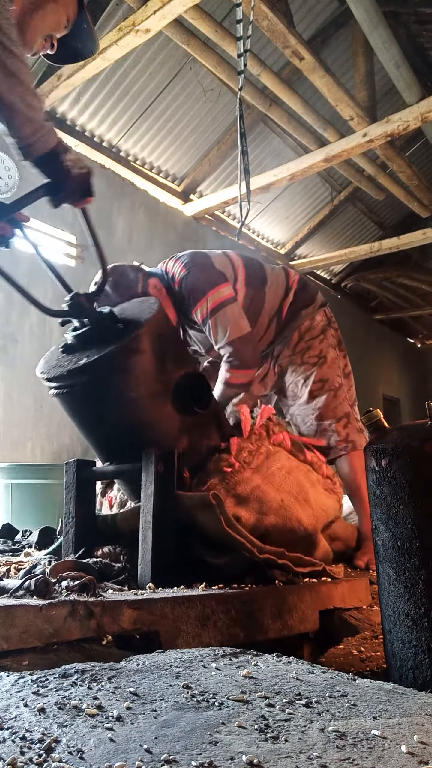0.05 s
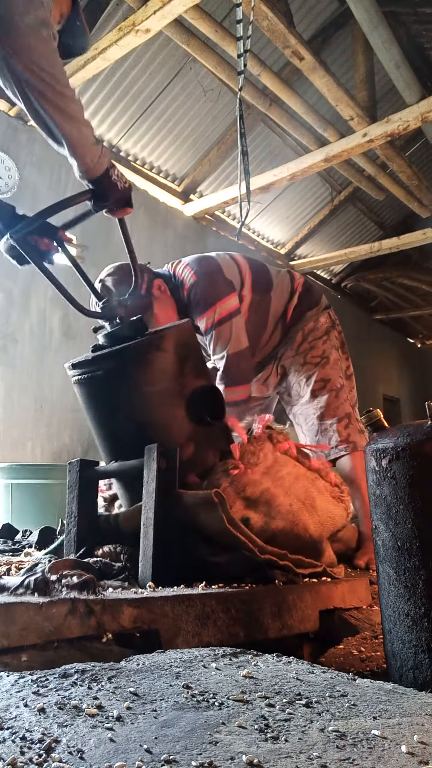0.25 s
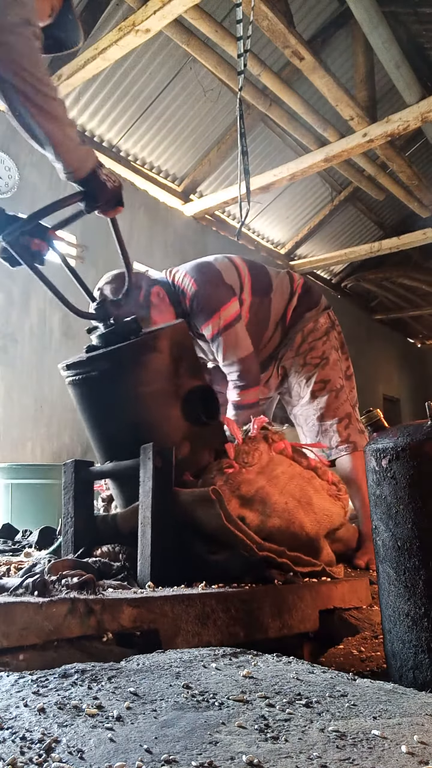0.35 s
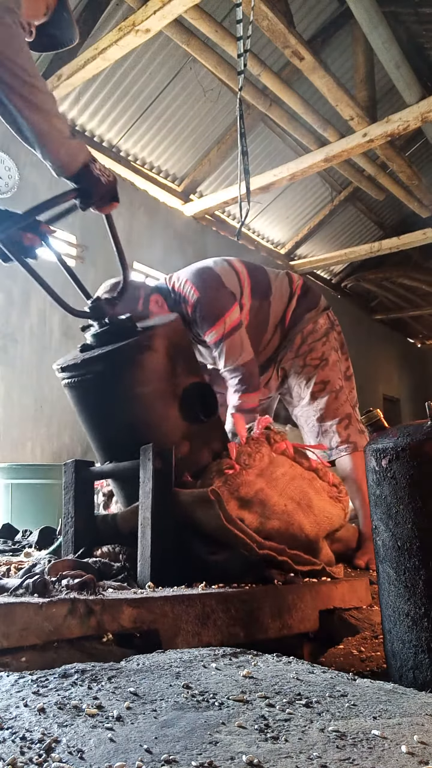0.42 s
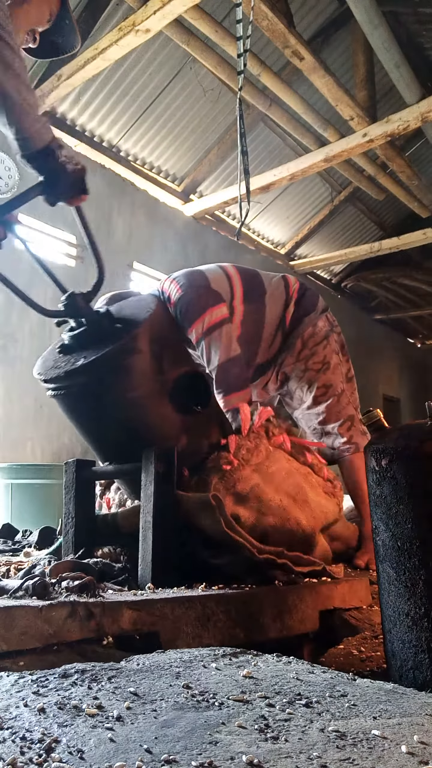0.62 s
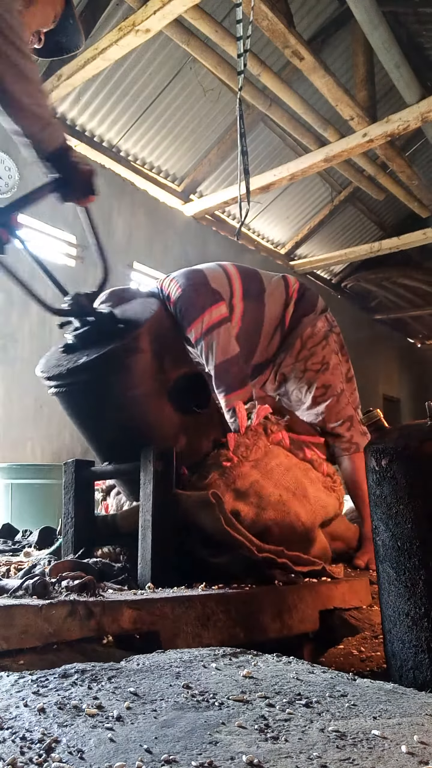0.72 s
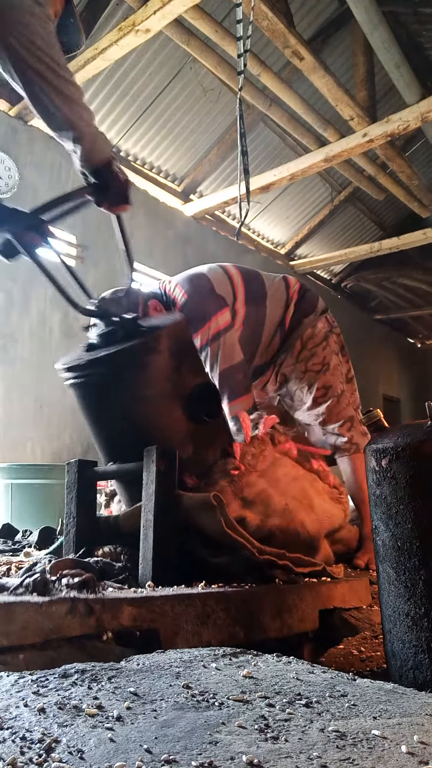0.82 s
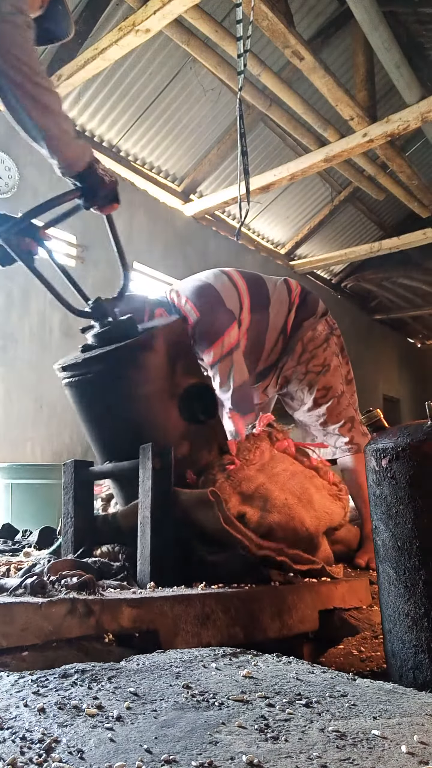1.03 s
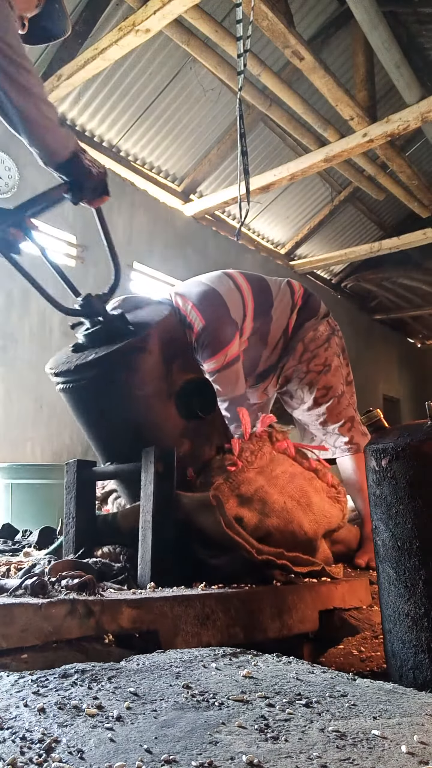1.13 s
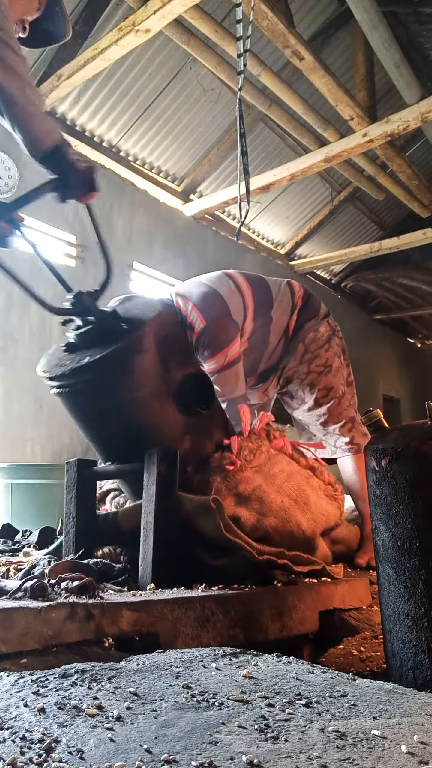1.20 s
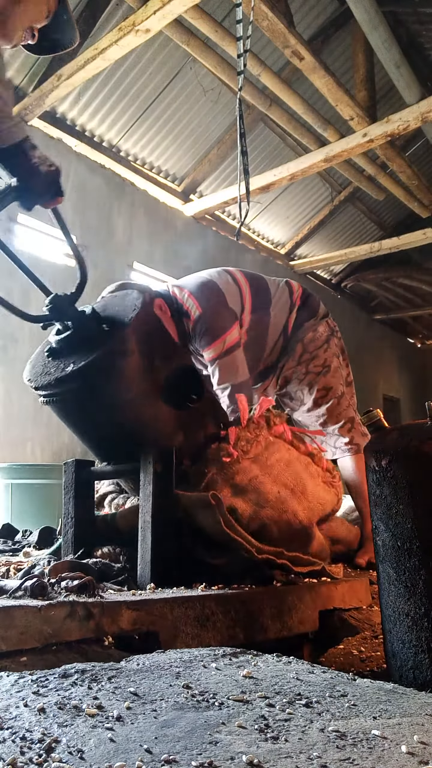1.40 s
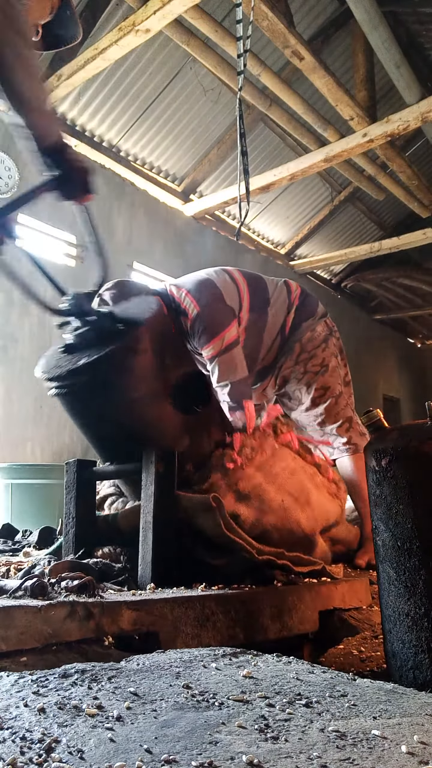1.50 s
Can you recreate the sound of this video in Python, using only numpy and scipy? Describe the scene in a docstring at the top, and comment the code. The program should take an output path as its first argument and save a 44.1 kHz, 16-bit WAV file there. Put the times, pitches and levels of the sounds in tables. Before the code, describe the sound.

Metal clanks and squeaks as a steel handle is worked twice on a metal vessel.

```python
"""In a shed, a steel handle is worked to and fro twice on a metal vessel.
Each stroke starts with a ring of the handle, scrapes, and ends in a rattling clank: a train of tiny
contacts that rings the steel and booms in the vessel. On the way back the dry pivot squeaks and the
handle clanks more lightly. A pin clinks, and the vessel knocks on its stand and rumbles as it rocks."""
import sys
import numpy as np
from scipy import signal
from scipy.fft import rfft, irfft, next_fast_len
from scipy.io import wavfile
from scipy.ndimage import uniform_filter1d, map_coordinates

SR = 44100
rng = np.random.default_rng(int(sys.argv[2]) if len(sys.argv) > 2 else 0)


def bounce(signal):
    """Save signal as a 16-bit WAV file at the path given by the first command-line argument."""
    frames = np.transpose(np.atleast_2d(signal))
    limited = np.clip(frames, -1, 1)
    pcm = np.round(limited * 32767).astype(np.int16)
    wavfile.write(sys.argv[1], SR, pcm)


N = 68355

# Each row: start in seconds, level in dB, boom against the clank in dB, rattle t60 in seconds,
# treble tilt in dB per octave, attack in seconds.
CLANK_HITS = [(0.2915, -16.5, -3.5, 0.059, -1, .002), (0.305, -18.5, -1.5, 0.04, 2, 0.0045),
              (0.34, -23.5, -5, 0.29, -1.5, 0.0097), (0.378, -27, -1, 0.093, -5.5, 0.0037),
              (0.4525, -33.5, -13.5, 0.16, -6, 0.003), (0.572, -37.5, -30, 0.073, 0, 0.0016),
              (0.583, -25, -22, 0.19, -1, 0.0012), (0.614, -34.5, -9.5, 0.11, -3, .003),
              (0.9152, -18.5, 2, 0.11, 3, .0012), (0.9225, -18.5, -50, 0.12, 2.5, 0.00067),
              (0.958, -22, 3, 0.13, -6, 0.003), (0.978, -21, -1.5, 0.15, -1.5, 0.001),
              (1.02, -31, 6.5, 0.27, -10.5, 0.0015), (1.217, -28.5, -35, 0.055, 6, 0.005),
              (1.231, -23, -14, 0.12, 2, .002), (1.299, -40, -9, 0.066, 2, 0.0012)]
def clanks(wall):
    """The handle hits its stop and the loose parts rattle to rest."""
    out, t = np.zeros(N), clock()
    for start, db, boom_db, t60, tilt_db, attack_s in CLANK_HITS:
        force = chatter() * amp(-60 * t / t60) * (1 - np.exp(-t / attack_s))
        add(out, start, amp(db) * shed(burst(metal(force, boom_db, tilt_db, wall))))
    return out


# Each row: start and length in seconds, level in dB, boom in dB, treble tilt in dB per octave.
SCRAPE_STROKES = [(0.236, 0.14, -28.5, 1, -5), (0.883, 0.041, -26, -6.5, -4.5),
                  (1.109, 0.086, -39.5, 0, -8.5), (1.535, 0.012, -48.5, -18, -3.5)]
def scrapes(wall):
    """Steel drags over steel as the handle moves."""
    out, t = np.zeros(N), clock()
    for start, length, db, boom_db, tilt_db in SCRAPE_STROKES:
        force = chatter() * np.sqrt(np.abs(np.sin(np.pi * np.minimum(t / length, 1))))
        gain = amp(db) * np.sqrt(length / 0.036)  # longer scrapes carry more energy
        add(out, start, gain * shed(metal(force, boom_db, tilt_db, wall)))
    return out


# Bright steel and hollow vessel. Each row: pitch in Hz, relative level in dB, t60 in seconds.
STEEL_MODES = [(1254, -3, 0.48), (1347, 2, 0.15), (1391, 11, 0.73), (1727, 9.5, 0.23), (2121, 6.5, 0.049),
               (3157, 0, 0.66), (3742, -12, 0.16), (3993, -4, 0.04), (4020, -18.5, .16), (4250, 1, 0.12),
               (4910, 9, 0.064), (5274, 8, 0.076), (5660, 11.5, 0.047), (5680, -22, 0.13),
               (9170, 8.5, 0.058)]
VESSEL_MODES = [(419, -38, 0.21), (542, -18, 0.098), (601, -8, 0.053), (660.4, 5, 0.064), (700.8, 6, 0.13),
                (727, 1, 0.092), (780, 2, 0.33)]
def metal(force, boom_db, tilt_db, wall):
    """Contacts click, ring the steel and the wall, and boom in the vessel."""
    clicks = burst(through(force, contact(tilt_db)))
    bright = burst(clicks + amp(-7) * burst(through(clicks, wall)))
    tilted = [(hz, db + tilt_db * np.log2(hz / 3000), t60) for hz, db, t60 in STEEL_MODES]
    steel = resonate(force, tilted)
    boom = burst(band(resonate(force, VESSEL_MODES), lo_hz=381, hi_hz=773))
    return bright + amp(-11.5) * steel + amp(boom_db) * boom


# The tone of the click. Each row: frequency in Hz, level in dB.
CONTACT_EQ = [(100, -41), (300, -45.5), (700, 3.5), (980, -20), (1350, 8), (1800, -1.5), (2900, 2.5),
              (4000, 4.5), (5300, 6), (7000, -5.5), (9300, -5), (11200, -7.5), (13000, -21.5), (15500, -12)]
def contact(tilt_db, size=2048):
    """The click of steel on steel, its treble tilted about 3 kHz."""
    hz = np.fft.rfftfreq(size, 1 / SR)
    octaves = np.log2(np.maximum(hz, 1000) / 3000)
    cepstrum = irfft(np.log(amp(along(CONTACT_EQ, hz) + tilt_db * octaves)))
    cepstrum[1:size // 2] *= 2  # minimum phase keeps the attack sharp
    cepstrum[size // 2 + 1:] = 0
    return irfft(np.exp(rfft(cepstrum)))


def chatter(spread=0.12, grain_samples=12):
    """A dense train of tiny contacts of uneven force."""
    n = len(clock())
    contacts = rng.standard_normal(n)
    grains = np.repeat(rng.standard_normal(n), grain_samples)[:n]
    return contacts * np.exp(spread * grains)


def vessel_wall(count=80, lo_hz=1607.6, hi_hz=11530, t60=0.067):
    """The sheet-metal wall answers a click with many close modes of uneven strength."""
    modes = []
    for k, (offset, weakness, sustain) in enumerate(rng.random((count, 3))):
        hz = lo_hz * (hi_hz / lo_hz) ** ((k + offset) / count)
        modes.append((hz, -6 * weakness, t60 * (.5 + sustain)))
    return ring(modes)


# Each row: start and length in seconds, pitch in Hz, level in dB,
# then octave overtone and rasp in dB against the fundamental.
PIVOT_SQUEAKS = [(0.006, 0.017, 4995, -37.5, -23, -26), (0.0, 0.072, 1220, -53.5, -9, -6.5),
                 (0.021, 0.066, 4577, -48, -16, -21), (0.132, 0.074, 3325, -50, -32, -19),
                 (0.197, 0.034, 1277, -25.5, -22, -17), (0.276, .007, 3776, -29, -30, 0),
                 (0.533, 0.026, 4357, -21, -16.5, -10.5), (0.568, .026, 4293, -21.5, -24.5, -13),
                 (0.572, 0.028, 1321, -39, -22, -17), (0.673, 0.069, 1320, -56.5, -34, 7.5),
                 (0.726, 0.14, 3320, -57.5, -26, -5.5), (0.837, 0.033, 1299, -34, -38, -24),
                 (1.063, 0.095, 1338, -42, -28, -4), (1.157, 0.052, 4400, -32.5, -24, 3.5),
                 (1.175, 0.016, 4375, -21.5, -48, -19), (1.194, 0.039, 1395, -34.5, -23, 2.5),
                 (1.225, 0.019, 4460, -25, -32, -7), (1.214, 0.099, 1360, -42, -25, 2),
                 (1.298, 0.032, 1290, -41, -35, 1.5)]
def squeaks(waver_depth=.007, waver_rate_hz=300, rasp_width_hz=320):
    """The dry pivot sticks and slips near one pitch, swelling and fading, with a rasp around it."""
    out, t = np.zeros(N), clock()
    for start, length, hz, db, octave_db, rasp_db in PIVOT_SQUEAKS:
        waver = map_coordinates(rng.standard_normal(len(t)), [t * waver_rate_hz])
        phase = 2 * np.pi * np.cumsum(hz * (1 + waver_depth * waver)) / SR
        tone = np.sqrt(2) * (np.sin(phase) + amp(octave_db) * np.sin(2 * phase))
        rasp = unit(band(rng.standard_normal(len(t)), hz - rasp_width_hz / 2, hz + rasp_width_hz / 2))
        swell = np.sin(np.pi * np.minimum(t / length, 1)) ** 2
        add(out, start, amp(db) * shed(swell * (tone + amp(rasp_db) * rasp)))
    return out


# The handle's ring. Each row: pitch in Hz, relative level in dB, t60 in seconds.
HANDLE_MODES = [(1252, -10, 0.6), (2181, 14.5, 0.033), (2960, -31, 0.13), (3830, 17, 0.021),
                (4170, 18, 0.03), (5550, -12, 0.18), (9360, 3, 0.032)]
# Each row: start in seconds, level in dB.
HANDLE_HITS = [(0.1985, -26.5), (0.8435, -33)]
def handle_rings():
    """The handle takes up its play and rings with a soft attack."""
    return taps(HANDLE_HITS, HANDLE_MODES, attack_s=0.017, crack_db=-7, tilt_db=-0.5, crack_t60=0.092)


# The pin's ring. Each row: pitch in Hz, relative level in dB, t60 in seconds.
PIN_MODES = [(5600, -8, 0.092), (7780, -0.5, 0.042), (7830, 2, 0.072), (7980, -5.5, 0.046),
             (8430, -6, .025), (8700, -1, 0.029), (9340, -6.5, .035), (9800, -10.5, 0.026)]
# Each row: start in seconds, level in dB.
PIN_HITS = [(0.2245, -35.5), (0.844, -30), (0.857, -32), (1.029, -32), (1.204, -42.5), (1.301, -40.5)]
def pin_clinks():
    """Light blows on the small pin give thin, high clinks."""
    return taps(PIN_HITS, PIN_MODES, attack_s=0.00071, crack_db=-3.5, tilt_db=6, crack_t60=0.047)


# The pin's ring on a landing. Each row: pitch in Hz, relative level in dB, t60 in seconds.
LANDING_MODES = [(5960, -10, 0.17), (6130, -1, 0.23), (7850, -26, .12), (8900, 4, 0.067), (8930, 4, 0.053),
                 (11200, -14, 0.041)]
# Each row: start in seconds, level in dB.
LANDING_HITS = [(0.585, -32), (1.234, -38.5)]
def landings():
    """The handle lands back and sets the pin ringing."""
    return taps(LANDING_HITS, LANDING_MODES, attack_s=0.00057, crack_db=-2, tilt_db=7.5, crack_t60=0.047)


# The body of a knock. Each row: pitch in Hz, relative level in dB, t60 in seconds.
STAND_MODES = [(214.5, -11.5, 0.11), (267.5, -12, 0.067), (307.4, -8.5, 0.11), (354.7, 1.5, 0.095),
               (403.6, 2, 0.1), (448.6, -3, 0.096), (497, -2.5, 0.083)]
# Each row: start in seconds, level in dB.
STAND_HITS = [(0.0, -34.5), (0.016, -32), (0.296, -35.5), (0.36, -35), (0.605, -45), (0.94, -32.5),
              (0.985, -43.5), (1.02, -37), (1.145, -39.5), (1.205, -39.5)]
def stand_knocks():
    """The vessel knocks dully on its stand."""
    return taps(STAND_HITS, STAND_MODES, attack_s=.012, crack_db=-10, tilt_db=-2, crack_t60=0.035)


# The rumble's fader moves. Each row: time in seconds, level in dB.
RUMBLE_FADER = [(0.0, -48.5), (0.05, -53), (0.072, -60), (0.206, -39.5), (0.322, -50.5), (0.358, -50),
                (0.43, -56), (0.604, -43.5), (0.772, -43), (0.932, -67), (1.022, -46.5), (1.044, -50),
                (1.134, -45), (1.23, -54.5), (1.51, -43.5), (1.55, -47.5)]
# Its tone. Each row: frequency in Hz, relative level in dB.
RUMBLE_EQ = [(25, -23), (48, -108), (64, 8), (80, 3.5), (102, 4), (124, 7.5), (155, -4), (200, -2),
             (300, -18.5), (700, -35)]
def rumble():
    """The rocking vessel gives a low noise that swells and sinks."""
    level_db = np.interp(np.arange(N) / SR, *np.transpose(RUMBLE_FADER))
    return amp(level_db) * noise(RUMBLE_EQ)


# The reverb's decay. Each row: frequency in Hz, t60 in seconds.
SHED_DECAY = [(100, 0.38), (600, 0.22), (1400, 0.31), (4000, 0.36), (8000, 0.36), (14000, 0.073)]
def shed(x, wet_db=-7.5, predelay_s=0.0051, build_s=0.0031):
    """The sound and the shed's diffuse answer to it."""
    t = clock()
    hz, frame_s, spectra = signal.stft(rng.standard_normal(len(t)), SR, nperseg=256)
    decay = amp(-60 * frame_s / along(SHED_DECAY, hz)[:, None])
    tail = signal.istft(spectra * decay, SR, nperseg=256)[1][:len(t)]
    tail *= 1 - np.exp(-np.maximum(t - predelay_s, 0) / build_s)
    return x + amp(wet_db) * through(x, tail / np.linalg.norm(tail))


# Each row: frequency in Hz, relative level in dB.
ROOM_TONE_EQ = [(25, -3), (100, -28), (200, -5), (400, 3.5), (700, 1.5), (1000, -14), (1600, -7.5),
                (3200, -4), (6000, -17), (12000, -18.5), (15000, -6)]
def room_tone():
    """The air of the shed, a faint steady bed."""
    return amp(-47) * noise(ROOM_TONE_EQ)


def taps(hits, modes, attack_s, crack_db, tilt_db, crack_t60):
    """Single blows on one part: its modes and a short crack."""
    out, t = np.zeros(N), clock()
    onset = 1 - np.exp(-t / attack_s)
    for start, db in hits:
        force = rng.standard_normal(len(t)) * amp(-60 * t / crack_t60) * onset
        crack = burst(through(force, contact(tilt_db)))
        add(out, start, amp(db) * shed(burst(ring(modes) * onset) + amp(crack_db) * crack))
    return out


def ring(modes):
    """Damped modes, a little different at each blow."""
    t = clock()
    return sum(amp(db + rng.normal(0, 3.4) - 60 * t / t60) * np.sin(2 * np.pi * (hz * t + rng.random()))
               for hz, db, t60 in modes)


def resonate(force, modes):
    """Damped modes driven by a force."""
    out = np.zeros(len(force))
    for hz, db, t60 in modes:
        pole = amp(-60 / (t60 * SR))
        mode = signal.lfilter([1, 0, -1], [1, -2 * pole * np.cos(2 * np.pi * hz / SR), pole ** 2], force)
        out += amp(db + rng.normal(0, 1)) * burst(mode)
    return burst(out)


def noise(eq):
    """Steady coloured noise of rms 1."""
    gain = amp(along(eq, np.fft.rfftfreq(N, 1 / SR)))
    return unit(irfft(rfft(rng.standard_normal(N)) * gain, N))


def band(x, lo_hz, hi_hz):
    """Steep band-pass."""
    return signal.sosfilt(signal.butter(3, [lo_hz, hi_hz], "bandpass", fs=SR, output="sos"), x)


def amp(db):
    """Decibels to gain."""
    return 10 ** (np.asarray(db) / 20)


def unit(x):
    """Scaled to rms 1."""
    return x / np.sqrt(np.mean(x ** 2) + 1e-20)


def burst(x):
    """Scaled to the energy of 10 ms at rms 1."""
    return x / np.sqrt(np.sum(x ** 2) / (.01 * SR) + 1e-20)


def along(points, hz):
    """Interpolates (Hz, value) points on a log axis."""
    point_hz, values = np.transpose(points)
    return np.interp(np.log(hz + 1), np.log(point_hz + 1), values)


def clock():
    """Seconds over the life of one sound."""
    return np.arange(int(.7 * SR)) / SR


def add(track, start, x):
    """Mixes x in at a start in seconds."""
    part = track[max(0, round(start * SR)):][:len(x)]
    part += x[:len(part)]


def through(x, response):
    """x convolved with a response."""
    return signal.fftconvolve(x, response)[:len(x)]


def scene():
    """All layers in one mono mix."""
    wall = vessel_wall()
    small_hits = handle_rings() + pin_clinks() + landings() + stand_knocks()
    return (clanks(wall) + scrapes(wall) + squeaks() + small_hits + rumble() + room_tone())[None]


def record(dry):
    """A mild noise suppressor turns down faint bands, and a high cut removes the very top."""
    threshold_db, depth_db, high_cut_hz = -64, 7.5, 16200
    spectra = signal.stft(dry, nperseg=512)[2]
    power = uniform_filter1d(np.abs(spectra) ** 2, size=15, axis=1)  # smooth across frequency
    power = uniform_filter1d(power, size=3, axis=2)  # and over time
    faint = 1 / (1 + (power / amp(threshold_db) ** 2) ** 2)
    cleaned = signal.istft(spectra * amp(-depth_db * faint), nperseg=512)[1][:, :N]
    size = next_fast_len(N + SR // 2)
    passband = np.fft.rfftfreq(size, 1 / SR) < high_cut_hz
    return irfft(rfft(cleaned, size) * passband, size)[..., :N]


dry = scene()
out = record(dry)
bounce(out)
```